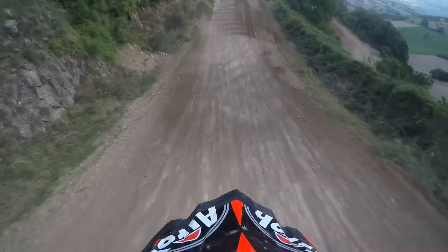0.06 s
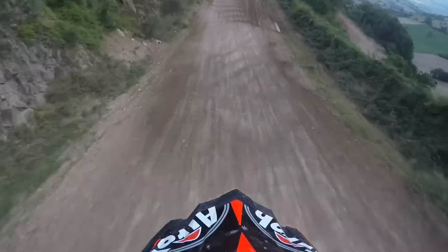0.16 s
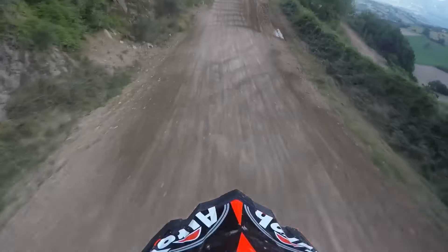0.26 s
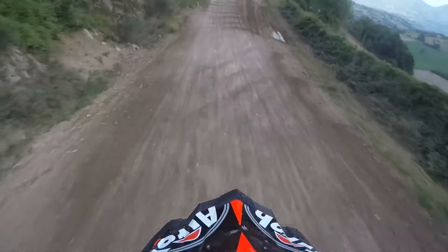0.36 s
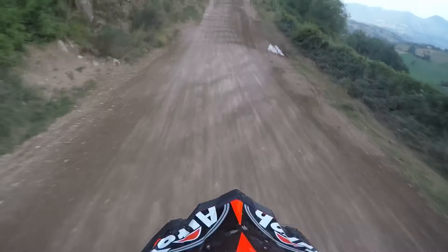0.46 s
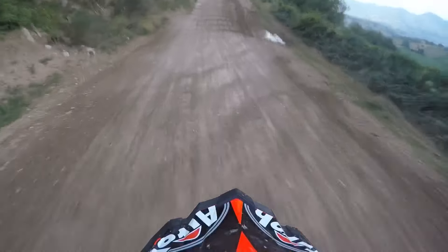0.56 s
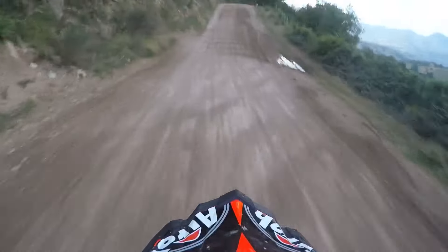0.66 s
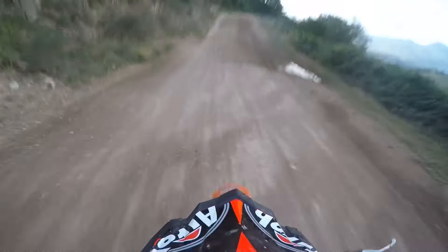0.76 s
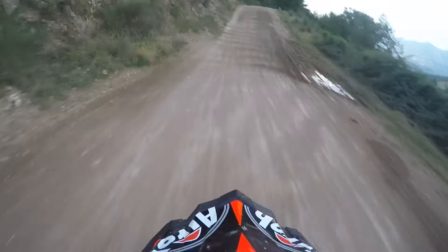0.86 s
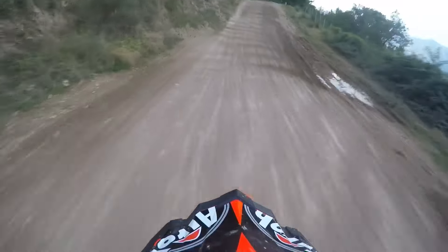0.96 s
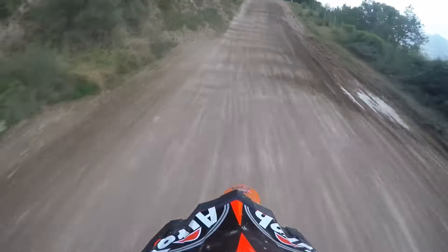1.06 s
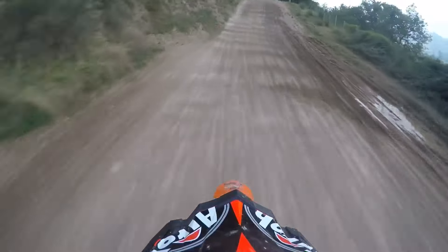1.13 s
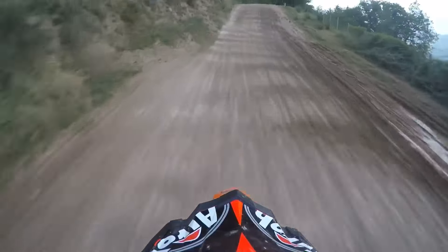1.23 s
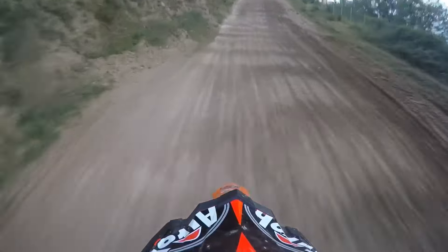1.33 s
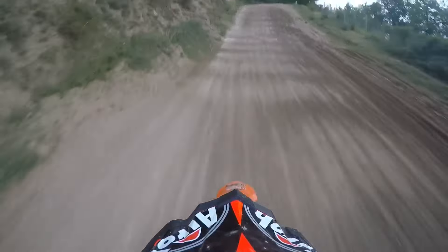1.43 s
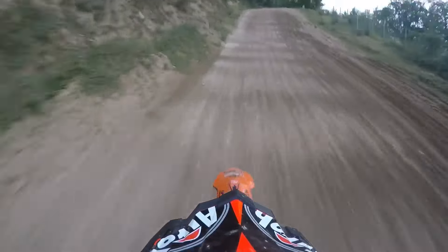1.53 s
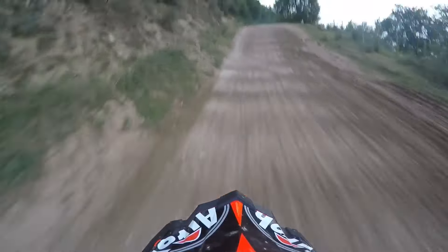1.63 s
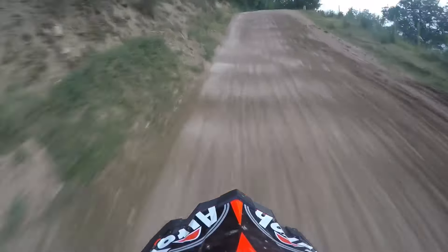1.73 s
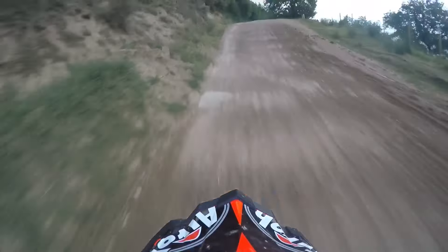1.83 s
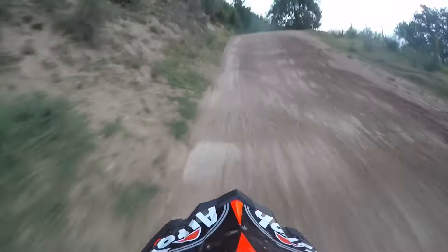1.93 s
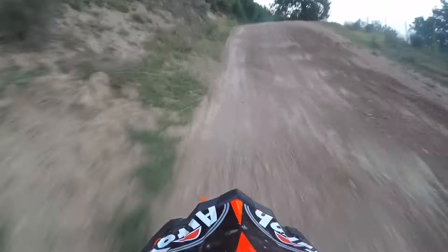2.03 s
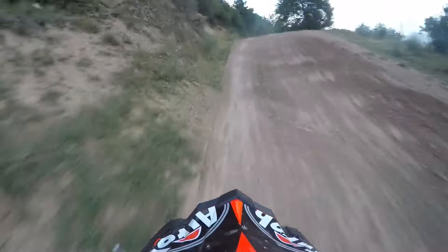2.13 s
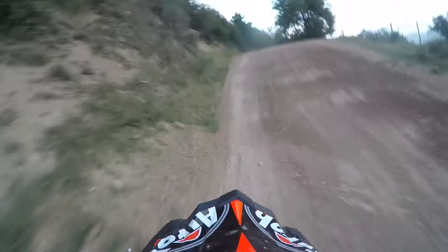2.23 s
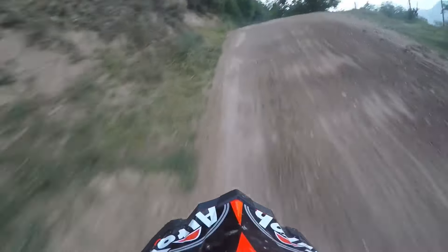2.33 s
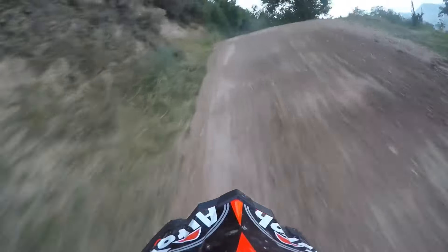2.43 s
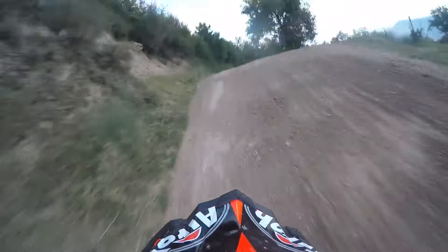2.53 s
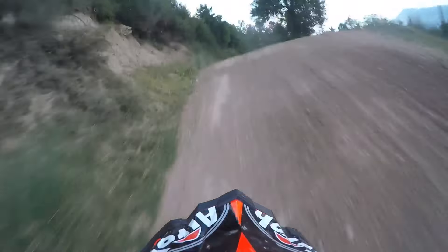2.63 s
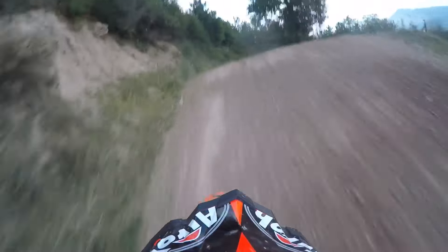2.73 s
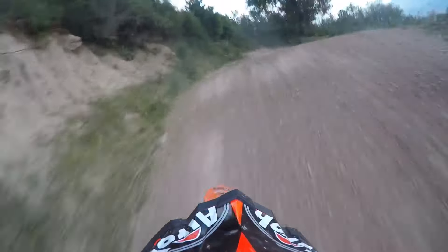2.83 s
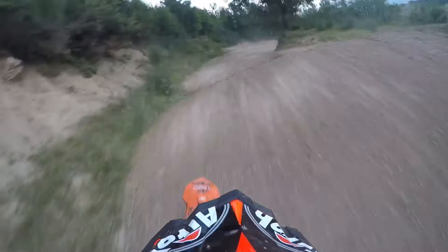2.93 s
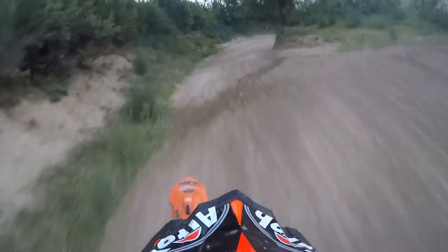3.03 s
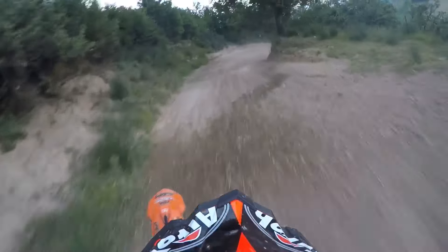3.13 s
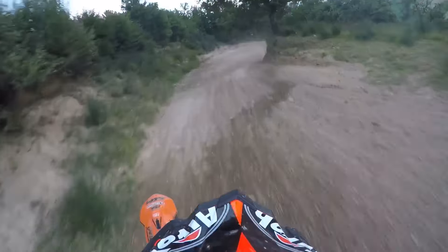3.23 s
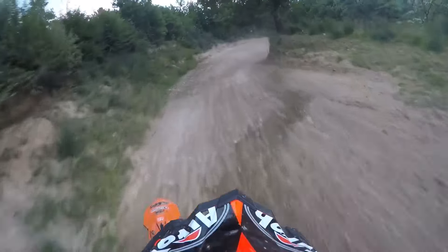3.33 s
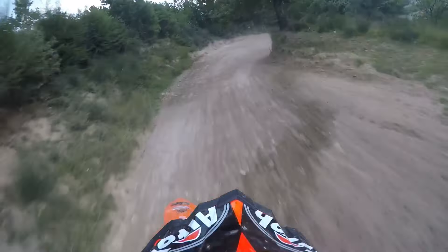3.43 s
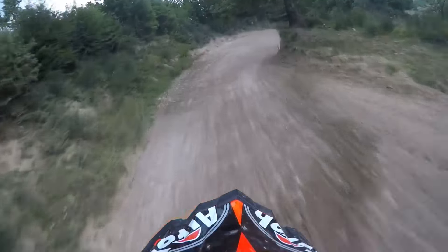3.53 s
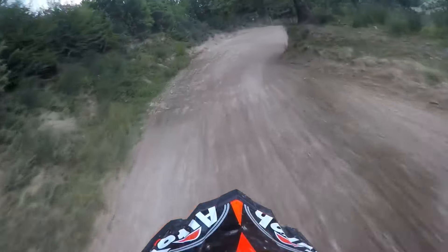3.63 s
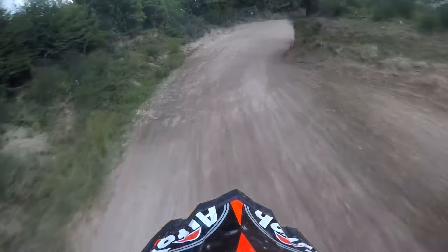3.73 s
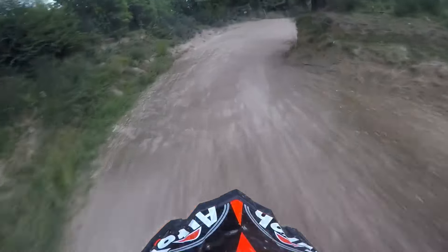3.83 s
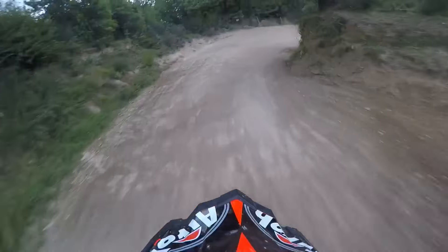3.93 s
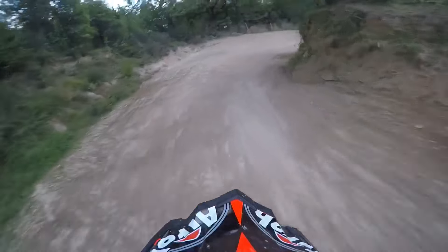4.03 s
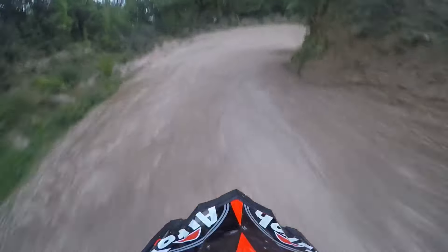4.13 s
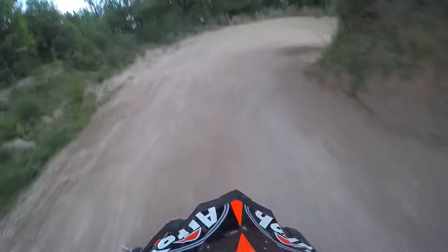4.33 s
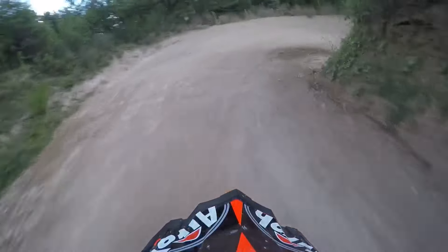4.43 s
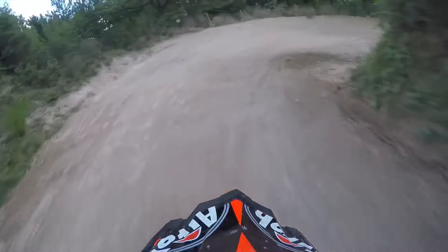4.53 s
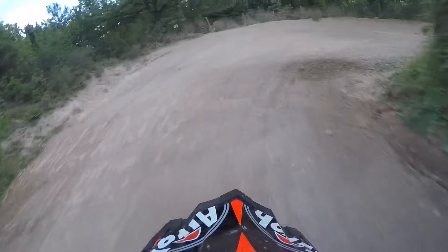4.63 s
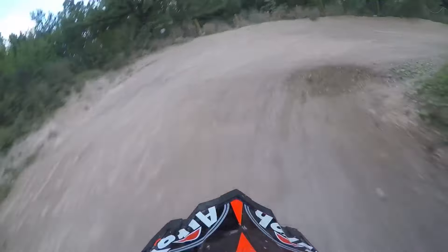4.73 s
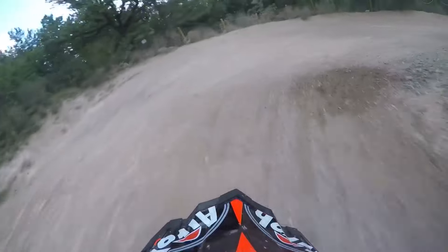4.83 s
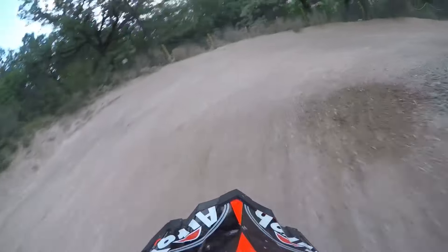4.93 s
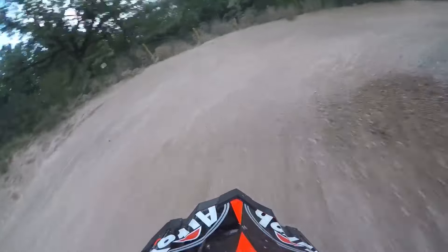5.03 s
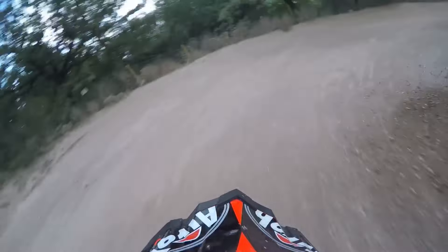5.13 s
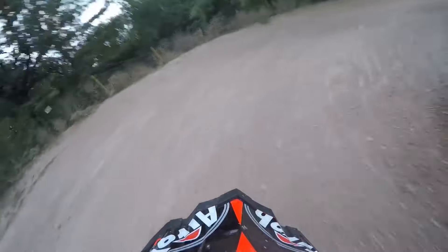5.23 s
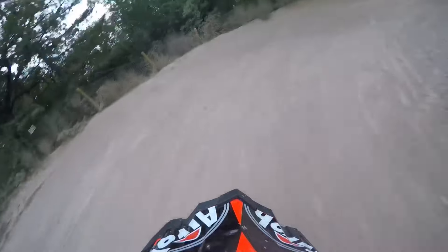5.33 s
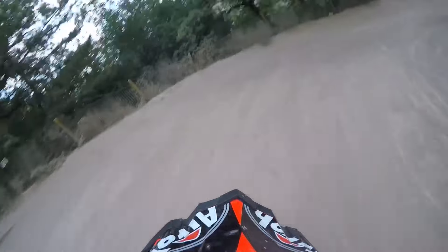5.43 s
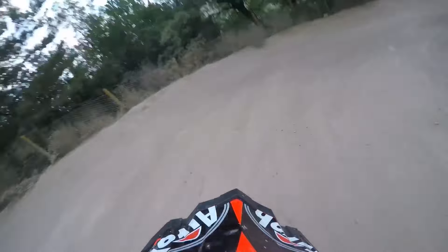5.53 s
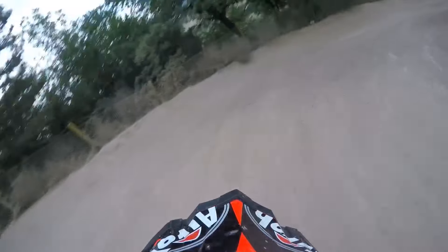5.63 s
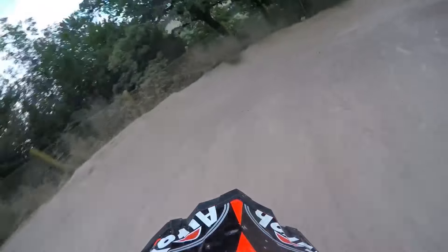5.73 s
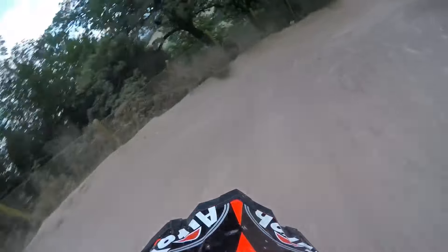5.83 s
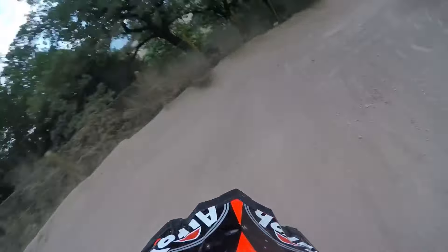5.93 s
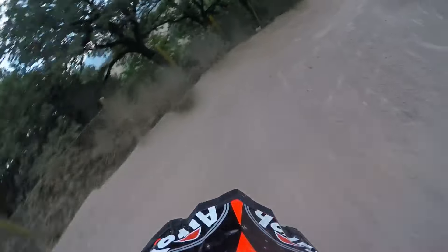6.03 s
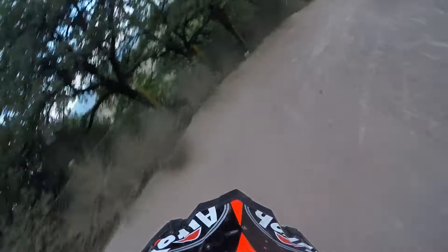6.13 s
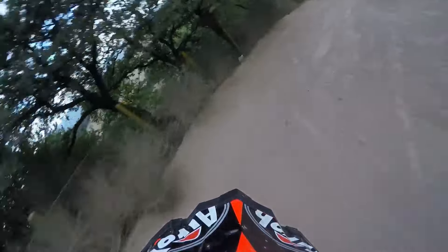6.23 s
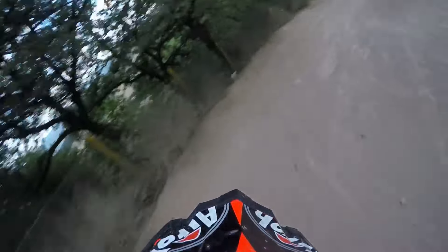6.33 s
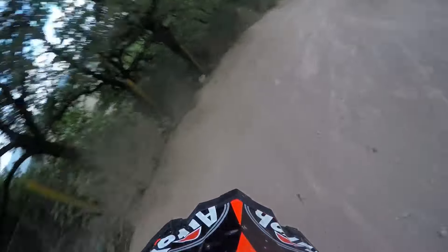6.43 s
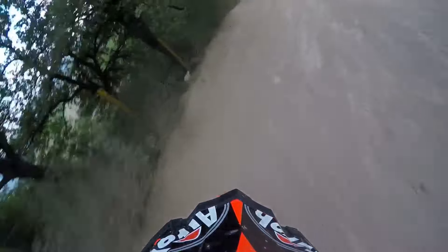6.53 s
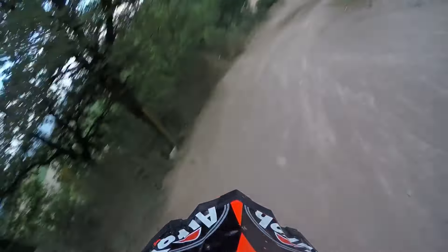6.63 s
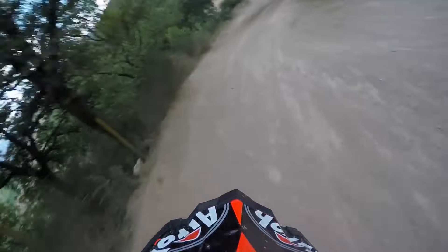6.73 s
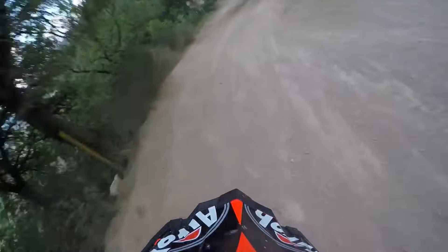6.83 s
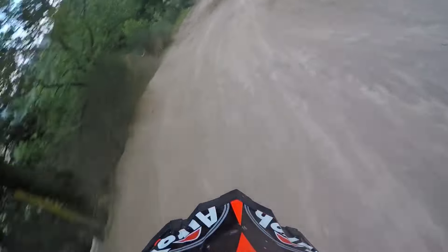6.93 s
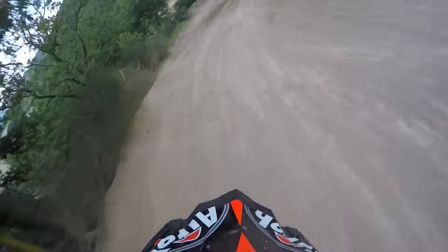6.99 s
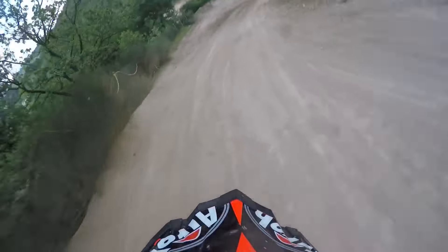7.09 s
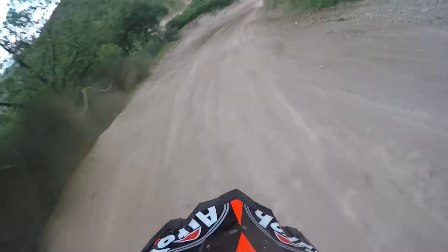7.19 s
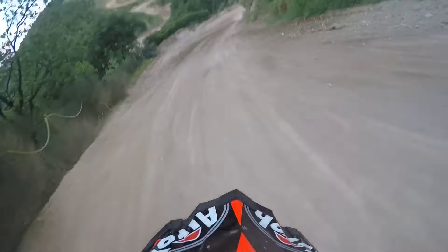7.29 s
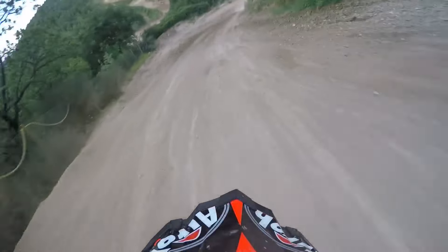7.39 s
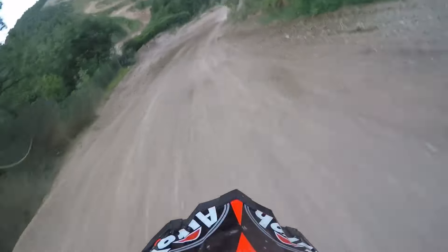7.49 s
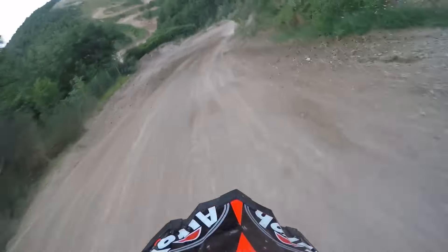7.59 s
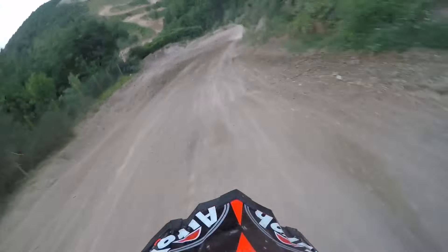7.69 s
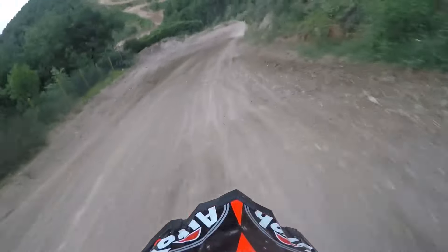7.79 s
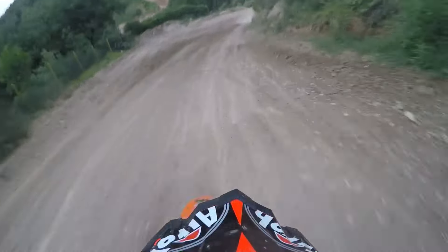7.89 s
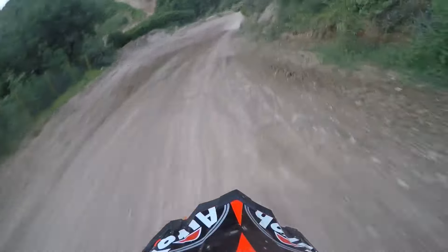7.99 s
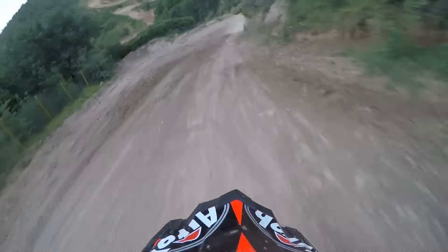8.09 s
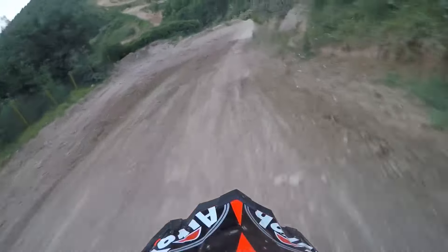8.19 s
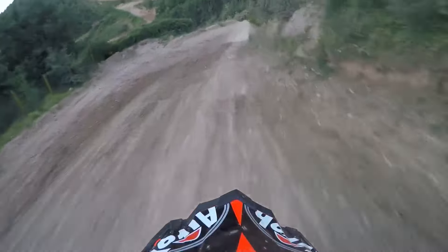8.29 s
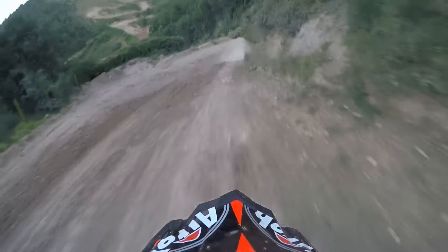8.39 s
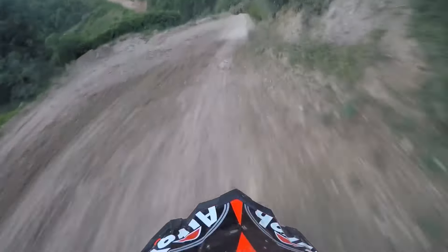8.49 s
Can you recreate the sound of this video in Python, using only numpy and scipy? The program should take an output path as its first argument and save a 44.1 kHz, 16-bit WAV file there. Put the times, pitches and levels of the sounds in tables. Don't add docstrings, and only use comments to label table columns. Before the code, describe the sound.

Deep wind buffeting and a narrow, breathy hiss surround a raspy dirt bike engine ridden over open ground. Snappy throttle bursts come first, then a falling note, brief blips and a frame knock. A long quiet coast with low engine pulses follows, before sputtering coughs and a rising, harsh pull to the end. The small housed microphone sits on the rider's helmet, close and dry.

```python
import sys
import numpy as np
from scipy import signal
from scipy.fft import rfft, irfft, next_fast_len
from scipy.io import wavfile
from scipy.ndimage import uniform_filter1d

SR = 44100
rng = np.random.default_rng(int(sys.argv[2]) if len(sys.argv) > 2 else 0)


def transcribe(signal):
    frames = np.atleast_2d(signal).T
    limited = np.clip(frames, -1, 1)
    pcm = np.round(limited * 32767).astype(np.int16)
    wavfile.write(sys.argv[1], SR, pcm)


def undo_db(level):
    steps = np.asarray(level, float) / 20
    return 10 ** steps


N = 377055
STEP = 64


def unit(x):
    return x / np.sqrt(np.mean(x ** 2))


def fine(slow):
    return np.interp(np.arange(N) / STEP, np.arange(len(slow)), slow)


def curves(table):
    s, *columns = np.transpose(table)
    t = np.arange(N) / SR
    return [uniform_filter1d(np.interp(t, s, column), SR // 100) for column in columns]


def bumps(rows):
    t = np.arange(N // STEP + 2) * STEP / SR
    return fine(sum(size * np.exp(-((t - s) / half) ** 2) for s, size, half in rows))


def walk(rate):
    k = int(SR / STEP / rate)
    held = np.repeat(rng.standard_normal(N // STEP // k + 2), k)
    return unit(uniform_filter1d(uniform_filter1d(held, k), k)[:N // STEP + 2])


def gain_at(hz, shape):
    f, db = np.transpose(shape)
    return undo_db(np.interp(np.log(hz + 1), np.log(f), db))


def ring(x, shape, size=8192):
    cepstrum = irfft(np.log(gain_at(np.fft.rfftfreq(size, 1 / SR), shape)))
    cepstrum[1:size // 2] *= 2
    cepstrum[size // 2 + 1:] = 0
    return unit(signal.fftconvolve(x, irfft(np.exp(rfft(cepstrum))))[:N])


def eddies(shape, shared_db, own_db, rate, count=6, source=None):
    size = next_fast_len(N)
    hz = np.fft.rfftfreq(size, 1 / SR)
    source = rng.standard_normal(N) if source is None else source
    spectrum = rfft(source, size) * gain_at(hz, shape)
    low_hz, high_hz = shape[1][0], shape[-2][0]
    place = np.clip(np.log((hz + 1) / low_hz) / np.log(high_hz / low_hz), 0, 1) * (count - 1)
    shared = shared_db * walk(rate)
    total = np.zeros(N)
    for k in range(count):
        band = irfft(spectrum * np.clip(1 - abs(place - k), 0, 1), size)[:N]
        total += fine(undo_db(shared + own_db * walk(rate))) * band
    return unit(total)


def partials(hz, shape, multiples, patchy_db, wander, lag):
    turns = np.cumsum(hz) / SR
    slow_hz = np.append(hz[::STEP], hz[-1])
    total = np.zeros(N)
    for k, db in multiples:
        swell_db = db + patchy_db * walk(14)[:len(slow_hz)]
        cycles = k * turns - lag * k ** 2 + fine(wander * walk(40))
        total += fine(gain_at(k * slow_hz, shape) * undo_db(swell_db)) * np.sin(2 * np.pi * cycles)
    return unit(total)


# [t/s, peak level/dB, swing f/Hz]
AIR_SLAPS = [(0.551, -6.5, 20), (0.636, -4.5, 30.5), (.758, -8.5, 50), (1.347, -12, 45), (1.57, -12, 24.6),
             (1.715, -12, 49), (2.013, -7, 19), (2.207, -9.5, 21.2), (2.294, -3, 31), (2.529, -11, 18.6),
             (2.63, -9.5, 27.4), (2.8, -15, 31), (2.943, -12, 20.2), (4.066, -25, 21), (4.115, -8.5, 20.4),
             (4.163, -12.5, 34), (4.208, -16, 37), (4.291, -22, 28), (4.908, -16.5, 8.3),
             (5.072, -13.5, 29), (5.176, -15, 32), (5.26, -13, 30), (5.586, -18.5, 23.5), (5.8, -20, 22),
             (6.223, -12.5, 27), (6.864, -10, 24), (7.257, -18, 20.6), (7.324, -24, 33.3), (7.654, -16, 23),
             (8.491, -22, 19.6)]


def slaps(turns):
    t, out = np.arange(N) / SR, np.zeros(N)
    for s, db, hz in AIR_SLAPS:
        near = slice(max(int((s - .2) * SR), 0), int((s + .2) * SR))
        cycles = (t[near] - s) * hz
        out[near] -= undo_db(db) * np.cos(2 * np.pi * cycles) * np.exp(-(cycles / turns) ** 2)
    return out


# [f/Hz, level/dB]
BUFFET_OUTLINE = [(5, -13), (12, 3), (22, 2), (35, -9), (55, -9), (100, -52), (300, -100)]
# [f/Hz, level/dB]
DRUM_OUTLINE = [(40, -17), (60, -7.5), (80, 1), (100, -10.5), (140, -17.5), (200, -37.5), (600, -98)]


def rumble(flow_db):
    wake_s, late_s = 0.07, 0.012
    buffet = undo_db(-23.5 + 0.08 * flow_db)
    buffet = buffet + bumps([(s, undo_db(db - 6.5), wake_s) for s, db, _ in AIR_SLAPS])
    drum = undo_db(-17 + 0.51 * flow_db)
    drum = drum + bumps([(s + late_s, undo_db(db - 17.5), wake_s / 2) for s, db, _ in AIR_SLAPS])
    low = buffet * eddies(BUFFET_OUTLINE, shared_db=-1.7, own_db=-5.9, rate=15.0, count=2)
    return low + drum * eddies(DRUM_OUTLINE, shared_db=2.0, own_db=-4.5, rate=15, count=2)


# [t/s, level/dB]
FLOW = [(0, -19.5), (.5, -20), (.9, -24), (1.3, -18.5), (1.86, -17), (2.28, -18), (2.38, -25), (2.6, -21),
        (2.85, -25), (3.3, -24.5), (3.98, -19), (4.3, -25), (5.25, -28.5), (5.4, -32), (6.4, -31),
        (6.58, -42), (6.72, -30.5), (8.45, -18.5)]
# [f/Hz, level/dB]
PORT_OUTLINE = [(120, -9), (200, -12), (280, -20), (352, -11.5), (560, -18.5), (916, -14), (1600, -12),
                (2110, -13.5), (2450, -1.5), (2780, -3.5), (3150, 1.5), (3400, 1.5), (4600, -25),
                (6500, -57)]
# [f/Hz, level/dB]
TOP_OUTLINE = [(2530, -63), (4300, -2.5), (4980, -1), (6140, -0.5), (6960, -1.5), (8320, -12), (10000, -12),
               (11400, -17.5), (12500, -14.5), (15000, -26)]
# [t/s, level/dB]
HEADWIND_SHEEN = [
    (0, 0),
    (1.1, 1),
    (1.6, 3),
    (2.28, 3.5),
    (2.7, -1.5),
    (8.55, -1),
]


def wind(rasp_db):
    flow_db, = curves(FLOW)
    low = rumble(flow_db)
    top = np.hypot(undo_db(-16.5 + 1.218 * flow_db), undo_db(-19.5 + rasp_db))
    grit = fine(undo_db(1.6 * np.maximum(walk(45) - 1, 0) ** 2))
    gusts = fine(undo_db(0.85 * walk(30)))
    hiss = undo_db(flow_db) * eddies(PORT_OUTLINE, shared_db=0.18, own_db=1.3, rate=45, count=8)
    air = eddies(TOP_OUTLINE, shared_db=0.15, own_db=0.0, rate=30, count=4)
    sheen = signal.sosfiltfilt(signal.butter(2, 7600, "high", fs=SR, output="sos"), air)
    air += (undo_db(curves(HEADWIND_SHEEN)[0]) - 1) * sheen
    return low + gusts * (hiss + top * grit * air)


# [t/s, level/dB]
FRAME_KNOCKS = [
    (2.6, -26),
    (4.118, -19),
    (6.627, -34),
    (6.68, -27),
    (6.712, -24),
    (6.745, -26.5),
]
# [f/Hz, level/dB]
KNOCK_OUTLINE = [(80, -29), (200, -3), (600, -5.5), (1500, -16), (3200, -1), (4600, -20), (7500, -27.5),
                 (9000, -46), (15000, -70)]


def knocks():
    noise = rng.standard_normal(N)
    blows = sum(undo_db(db) * (np.arange(N) == int(s * SR)) for s, db in FRAME_KNOCKS)
    blows = uniform_filter1d(blows, SR // 250)
    decay = signal.lfilter([1], [1, -np.exp(-1 / (0.015 * SR))], blows)
    return decay * ring(noise, KNOCK_OUTLINE)


# [t/s, f/Hz, width/Hz, length/s, level/dB]
METAL_RINGS = [(.04, 13100, 400, .015, -50), (.3, 5500, 150, .05, -46), (.31, 13100, 422, .03, -63),
               (0.417, 1394, 40, 0.11, -28), (0.395, 6820, 150, 0.075, -40.5),
               (0.717, 6865, 200, 0.039, -45), (1.174, 6700, 200, .03, -43), (2.95, 2760, 90.5, 0.041, -21),
               (2.914, 3390, 111.1, 0.03, -21), (7.89, 5600, 500, .05, -44), (7.939, 7266, 400, 0.044, -37)]


def rattle():
    out = np.zeros(N)
    t = np.arange(-SR // 8, SR // 8) / SR
    for s, hz, width, length, db in METAL_RINGS:
        mode = signal.iirpeak(hz, hz / width, SR)
        once = signal.lfilter(*mode, rng.standard_normal(len(t)))
        flare = undo_db(db) * np.exp(-(t / length) ** 2) * unit(signal.lfilter(*mode, once))
        at = (t * SR + s * SR).astype(int)
        out[at[at >= 0]] += flare[at >= 0]
    return out


# [t/s, f/Hz]
ROAD_SPEED = [(0.0, 87.7), (0.162, 81.84), (0.355, 116), (0.478, 116.8), (0.591, 73.1), (0.863, 83.75),
              (1.766, 96), (1.947, 70.55), (2.357, 56.4), (3.077, 64.64), (3.619, 42.4), (3.799, 64.8),
              (4.098, 59.55), (4.256, 39.65), (6.543, 28), (7.091, 60.0), (7.72, 66.9), (8.55, 86.2)]
# [t/s, change f/Hz, half length/s]
WHEEL_SLIP = [(1.004, 4, 0.043), (1.116, -3, 0.052), (1.248, 3, 0.034), (1.372, 7.5, 0.045),
              (1.438, -1.53, 0.017), (1.71, 3.5, 0.039), (2.195, 5.0, 0.067), (2.651, 6, 0.089),
              (2.801, -0.8, 0.01), (2.961, 13.5, 0.085), (3.903, 4.5, 0.081), (4.921, 5, 0.12),
              (5.444, -3.5, 0.12), (6.059, 8, 0.382), (6.246, 6.5, 0.102), (6.911, 7, 0.07),
              (7.441, 4.5, 0.17), (7.583, 10, 0.049), (7.738, -2.5, 0.073), (7.915, 14, 0.064),
              (7.912, 30, 0.24), (8.336, 17, 0.16)]


def firing_rate():
    return curves(ROAD_SPEED)[0] + bumps(WHEEL_SLIP)


# [full from t/s, shut at t/s, note level/dB, opening/(dB/s), extra harshness level/dB]
TWISTS = [(0, 0.12, -32.5, 300, 3), (0.204, .34, -11.5, 302, 2), (0.35, .56, -13, 300, -1.5),
          (0.596, 0.827, -14.5, 300, -2), (0.997, 1.784, -16, 37, -2), (2.6, 2.8, -36, 21, 0.5),
          (2.9, 2.998, -14, 230, 2), (3.096, 3.42, -36, 97, 3), (3.703, 3.79, -21.5, 309, 0),
          (3.851, 4.068, -36.5, 100, -3), (6.708, 6.97, -34, 200, -0.5), (6.995, 7.25, -31.5, 28, -0.5),
          (7.495, 7.55, -19.5, 27, 2), (7.622, 7.846, -11, 82, 1), (7.88, 8.5, -12.5, 117, 0)]


def throttle(hz):
    t = np.arange(0, N, STEP) / SR
    closing = 300
    rows = []
    for full, shut, db, opening, _ in TWISTS:
        rows.append(db - opening * np.maximum(full - t, 0) - closing * np.maximum(t - shut, 0))
    rows.append(-41.5 + 8 * np.log2(hz[::STEP] / 45))
    levels = np.array(rows)
    harsh_db = np.append(np.array(TWISTS)[:, -1], 0)[levels.argmax(axis=0)]
    return uniform_filter1d(fine(levels.max(axis=0)), SR // 50), uniform_filter1d(fine(harsh_db), SR // 30)


def firings(hz, jitter, scatter_db):
    turns = np.cumsum(hz) / SR
    at = np.interp(np.arange(1, int(turns[-1])), turns, np.arange(N))
    rate = hz[at.astype(int)]
    early, strong = rng.standard_normal((N // 200, 2))[:len(at)].T * 90 / rate
    at = np.clip(at + jitter * early * SR / rate, 0, N - 2)
    size, i = undo_db(scatter_db * strong) * 90 / rate, at.astype(int)
    return np.bincount(i, size * (1 - at + i), N) + np.bincount(i + 1, size * (at - i), N)


def smear(x, spread_s, size=4096):
    steps = np.repeat(rng.random(size // 16 + 1), 8)
    lag = spread_s * uniform_filter1d(steps, 4)[:size // 2 + 1]
    response = irfft(np.exp(-2j * np.pi * np.cumsum(lag) * SR / size))[:size // 4]
    return signal.fftconvolve(x, response)[:N]


# [t/s, level/dB]
BRAKING_THUD = [(0, -26), (1.3, -34.5), (2.2, -32.5), (3.05, -33), (3.5, -21.5), (4.0, -26), (4.2, -37),
                (5.0, -39), (6.0, -36), (6.28, -30), (6.5, -42), (7.3, -40), (7.55, -39), (8.55, -32)]
# [f/Hz, level/dB]
COAST_OUTLINE = [(40, -26), (75, 4), (110, 4), (150, 5), (175, -10.5), (260, -17), (340, -32), (420, -57),
                 (700, -31), (1500, -110)]


def thud(clicks):
    thud_db = curves(BRAKING_THUD)[0] + fine(2.5 * walk(8))
    return undo_db(thud_db - 2) * ring(clicks, COAST_OUTLINE)


# [f/Hz, level/dB]
RASP_OUTLINE = [(500, -62), (750, -11), (930, -4), (1000, -1), (1250, 0), (1450, 1.5), (1620, 2.5),
                (1800, -3), (2110, -7.5), (2340, 0), (3240, -9.5), (4500, -15.5), (6000, -58)]


def rasp(hz, clicks, spread, load):
    puff = unit(signal.lfilter([1], [1, -np.exp(-1 / (0.018 * SR))], clicks * hz))
    gas = unit((2 + puff) * eddies(RASP_OUTLINE, shared_db=1.5, own_db=1.2, rate=25))
    tone = eddies(RASP_OUTLINE, shared_db=.5, own_db=2.6, rate=16, count=12, source=spread * np.sqrt(hz))
    return (1 - .5 * load) * gas + (.4 + .55 * load) * tone


# [f/Hz, level/dB]
BARK_OUTLINE = [(300, -60), (400, -9), (476, 0), (600, -1), (700, -1), (770, -10), (900, -11), (1100, -28),
                (1500, -90)]


def bark(hz, note_db, lit, rush):
    fade = np.exp(-1 / (0.077 * SR))
    bite_db = 0.45 * signal.lfilter([1], [1, -fade], np.maximum(np.gradient(note_db), 0))
    speed_db = 4.5 * np.log2(hz / 90) * (note_db + 36) / 30
    bark_db = -20.5 + 0.7 * note_db + bite_db + speed_db
    multiples = [(k, -.8 * max(k - 7, 0)) for k in range(4, 16)]
    tone = partials(hz, BARK_OUTLINE, multiples, patchy_db=2.5, wander=.03, lag=.06)
    return undo_db(bark_db) * (lit * tone + (1 - .7 * lit) * ring(rush, BARK_OUTLINE))


# [f/Hz, level/dB]
SILENCER_OUTLINE = [(76, -62), (130, -18), (150, -28.5), (183, -10.5), (243, -3), (285, 4), (352, -2.5),
                    (415, -26), (430, -23), (560, -69), (950, -120)]
# [f/Hz, level/dB]
LIGHT_OUTLINE = [(100, -32.5), (170, -6.5), (230, -1.5), (280, 1), (340, 3), (390, -5), (450, -15),
                 (800, -98.5)]
# [multiple, level/dB]
PULSE_MULTIPLES = [(1, -21), (2, 3), (3, -2), (4, -3), (5, -3.5), (6, 4)]


def silencer(hz, spread, load, lit, rush):
    light = ring(lit * unit(spread) + (1 - .6 * lit) * rush, LIGHT_OUTLINE)
    full = partials(hz, SILENCER_OUTLINE, PULSE_MULTIPLES, patchy_db=1.3, wander=.05, lag=1 / 4)
    return load * full + (1 - load) * light


def engine(hz, note_db, rasp_db):
    clicks = firings(hz, jitter=.0035, scatter_db=.8)
    spread = smear(clicks, spread_s=.013)
    load = np.clip((note_db + 32) / 12, 0, 1)
    lit = np.clip((note_db + 46) / 10, 0, 1)
    rush = rng.standard_normal(N)
    low = thud(clicks) + undo_db(note_db) * silencer(hz, spread, load, lit, rush)
    return low + bark(hz, note_db, lit, rush) + undo_db(rasp_db) * rasp(hz, clicks, spread, load)


def scene():
    hz = firing_rate()
    note_db, harsh_db = throttle(hz)
    rasp_db = -14 + 0.56 * note_db + harsh_db
    air = wind(rasp_db) + slaps(turns=0.71)
    return (air + knocks() + rattle() + engine(hz, note_db, rasp_db))[None]


def top_cut(x):
    return signal.sosfilt(signal.butter(12, 15200, fs=SR, output="sos"), x)


def record(dry):
    mix = np.tanh(1.069 * dry) / 1.081
    return top_cut(mix)


dry = scene()
out = record(dry)
transcribe(out)
```